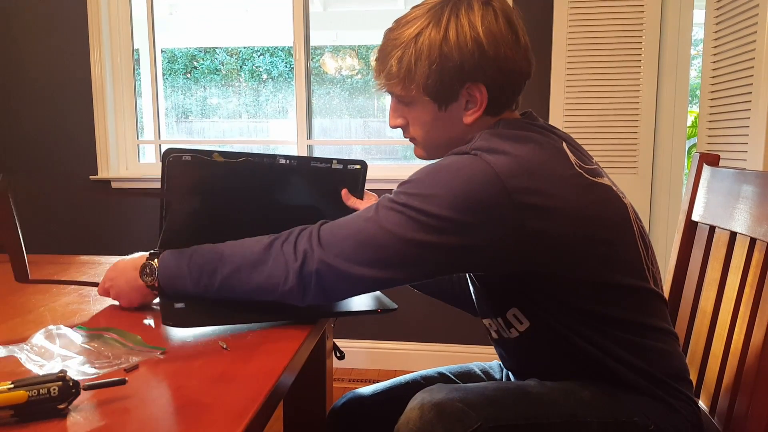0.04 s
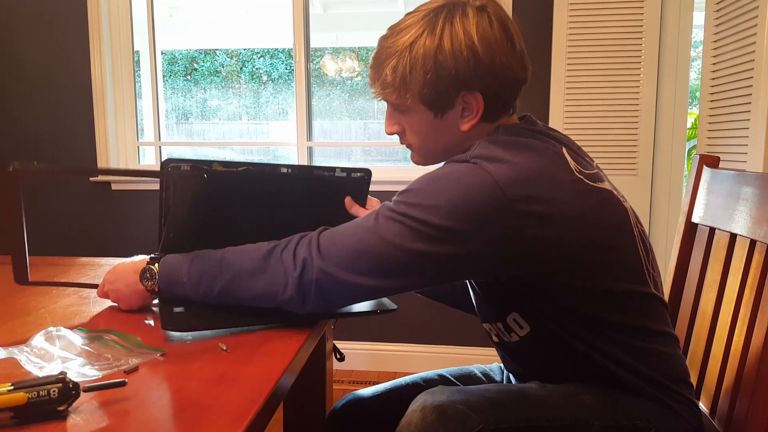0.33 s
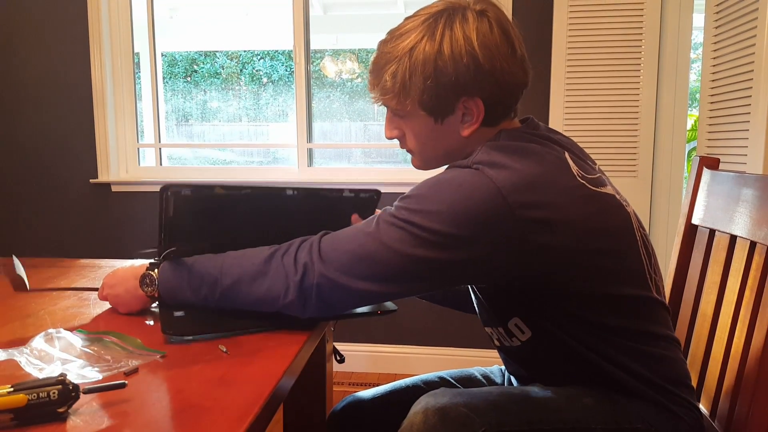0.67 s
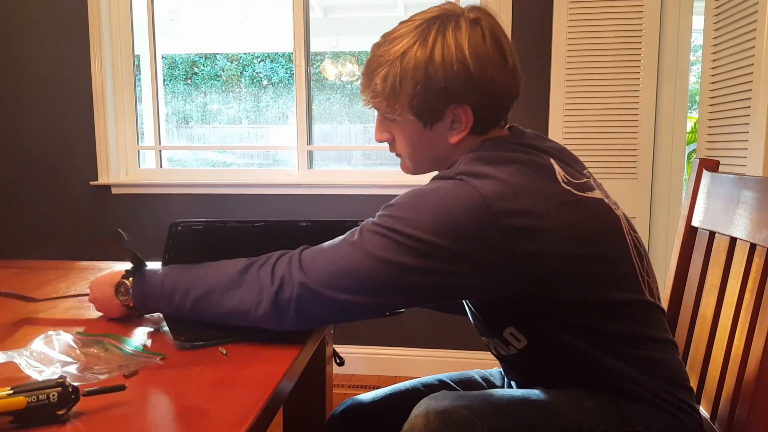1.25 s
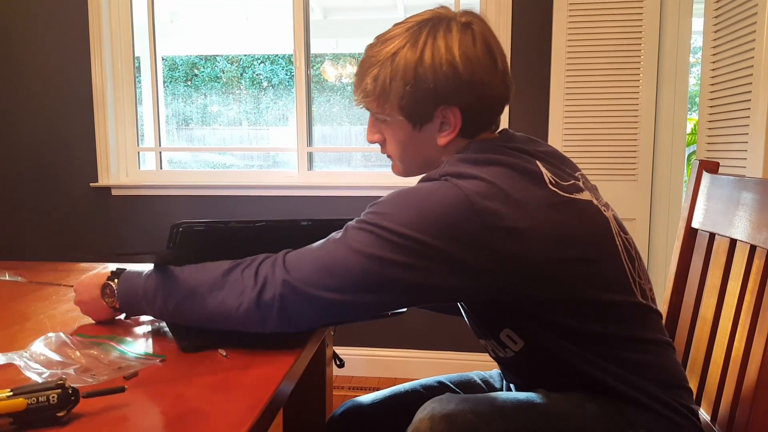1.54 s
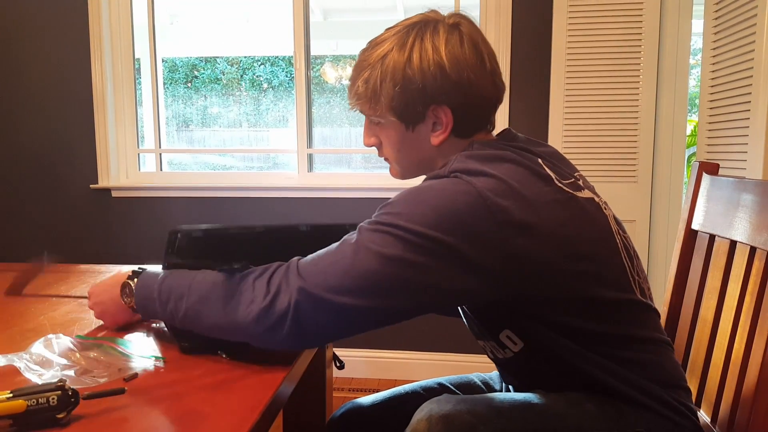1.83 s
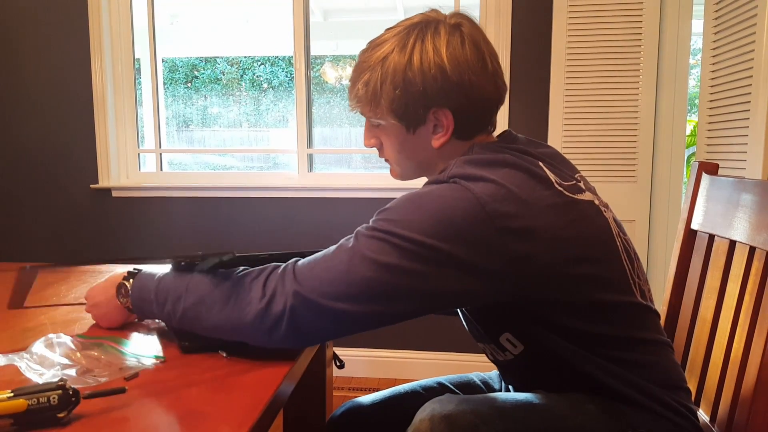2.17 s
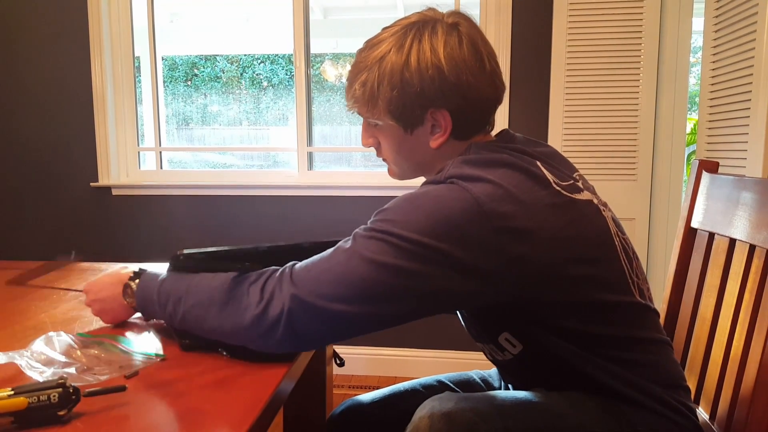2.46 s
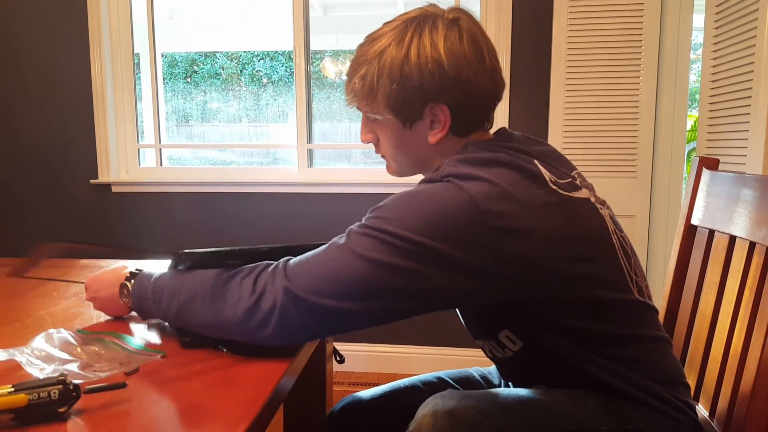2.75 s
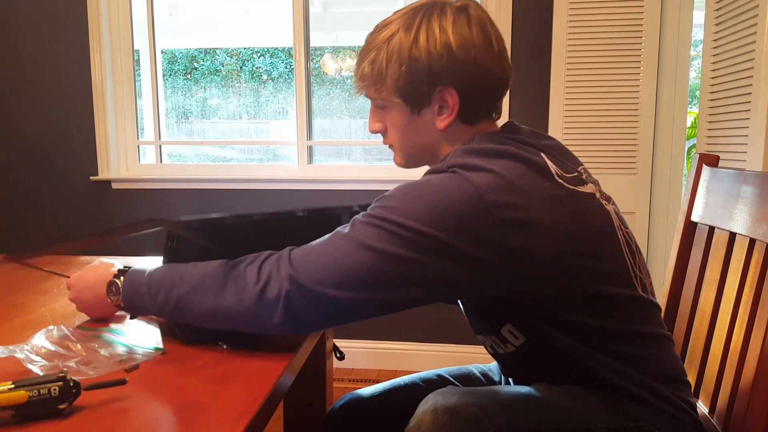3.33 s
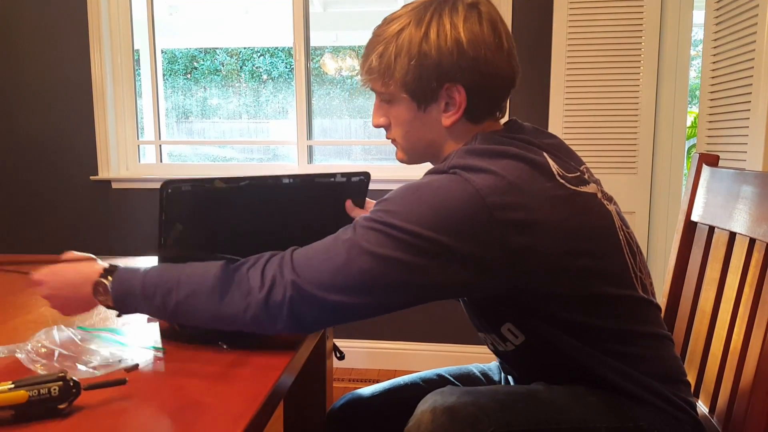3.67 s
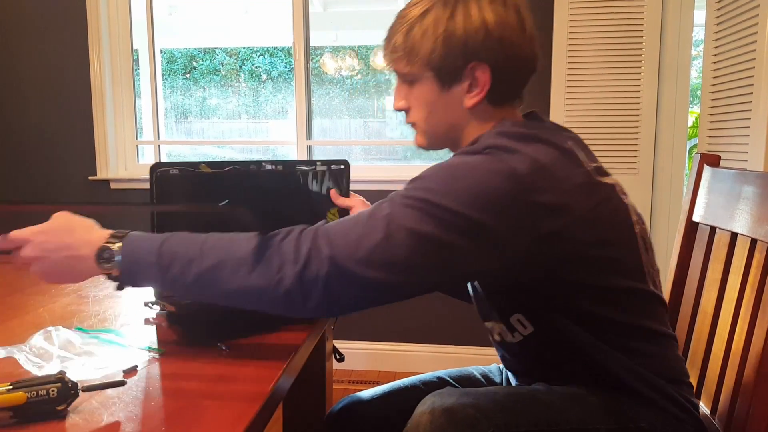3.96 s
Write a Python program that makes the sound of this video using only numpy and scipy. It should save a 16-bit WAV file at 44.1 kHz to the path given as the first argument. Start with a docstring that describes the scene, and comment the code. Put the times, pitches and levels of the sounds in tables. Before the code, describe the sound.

Plastic laptop lid clicking and knocking as it is lowered and raised in a quiet room.

```python
"""Closing and opening a laptop

A plastic laptop lid is lowered, pressed down and raised again on a wooden table in a quiet room.
Catches snap, the case knocks and rings briefly into the room, and plastic and sleeve rub. Tiny slips
make the hinge hiss and the plastic creak. A household appliance hums underneath."""
import sys
import numpy as np
from scipy import signal
from scipy.fft import rfft, irfft
from scipy.io import wavfile

SR = 44100
rng = np.random.default_rng(int(sys.argv[2]) if len(sys.argv) > 2 else 0)


def dump(signal):
    """Clip the signal to [-1, 1] and save it as 16-bit WAV at the path in sys.argv[1]."""
    limited = np.clip(np.atleast_2d(signal).T, -1, 1)
    pcm = np.round(limited * 32767).astype(np.int16)
    wavfile.write(sys.argv[1], SR, pcm)


N = 176400

# each time lid and case touch: (time [s], low [dB], mid [dB], treble [dB], top [dB],
# extra level of the snap [dB], pitch of the struck spot [Hz])
TOUCHES = [ (0.008, -63, -58, -69, -71, 4, 1220), (0.388, -69, -57, -62.5, -55.5, 6, 1940),
           (1.527, -59, -48.5, -43, -46.5, 7.5, 2210), (1.625, -50, -56.5, -72, -82, -10, 457),
           (1.820, -56, -62, -64, -69, -10, 1930), (1.986, -69, -52.5, -51.5, -53.5, 8.5, 7350),
           (2.065, -65, -51.5, -49.5, -62, 4, 7100), (2.115, -48.5, -39.5, -47.5, -54, 1, 974),
           (2.314, -50.5, -43, -55.5, -61, 1, 2090), (2.362, -48, -43, -42, -50, 10.5, 7450),
           (2.385, -48.5, -46.5, -56, -52, -10, 7450), (2.484, -66, -46.5, -57.5, -67, 0, 880),
           (2.505, -58, -49, -55.5, -65, -6, 1227), (2.639, -63, -54, -63, -80, -3, 1007),
           (2.699, -47, -48.5, -64, -61, 3, 1283), (2.711, -51, -70, -54.5, -54, 0, 11900),
           (2.761, -43.5, -46.5, -55, -64, 10, 340), (2.765, -48, -42.5, -46.5, -52.5, 7, 1280),
           (2.791, -52, -56, -52.5, -58, 6, 356), (2.852, -57, -57, -53, -61, 5, 640),
           (2.888, -66, -49, -63, -76, 2, 1283), (3.256, -72, -60, -69, -77, 6, 2544),
           (3.497, -60, -54.5, -61.5, -55, 10.5, 13700), (3.622, -62, -57, -57.5, -74, 8, 2970),
           (3.838, -49.5, -53.5, -64, -74, 8, 609), (3.982, -52.5, -51.5, -67.5, -80, -1, 644)]
# how alike left and right sound: (frequency [Hz], likeness [0 to 1])
STEREO_LIKENESS = [(60, .99), (140, 0.93), (350, 0.89), (700, 0.61), (1400, 0.049), (2800, 0.17),
                   (14000, 0.04)]
EDGES_HZ = np.geomspace(28, 17000, 21)  # borders of the noise bands
BANDS_HZ = np.sqrt(EDGES_HZ[1:] * EDGES_HZ[:-1])
TAIL, ATTACK_S = int(.7 * SR), 0.00085  # a knock's length in samples, and its rise time
SPOT_Q = 29  # higher means a touched spot rings at a clearer pitch


def from_db(db):
    """Turn decibels into a gain to multiply by."""
    return 10 ** (np.asarray(db) / 20)


def rms_one(x):
    """Scale a signal so its average strength (rms) is 1."""
    return x / np.sqrt(np.mean(x ** 2) + 1e-20)


def at_hz(points, hz):
    """Read between the rows of a table, spacing octaves evenly."""
    row_hz, value = np.transpose(points)
    return np.interp(np.log(hz), np.log(row_hz), value)


def colour(levels, hz):
    """Gain at hz of a sound with the given low, mid, treble and top levels."""
    # tone shared by knocks, snaps and rubs: (frequency [Hz], level [dB])
    body = [(40, -41), (120, -8), (240, -6.5), (500, -5.5), (1300, -3), (2400, -5), (3600, -5.5),
            (6500, -5.5), (10000, -6.5), (14000, -5.5)]
    own_db = np.interp(np.log(hz), np.log([350, 1300, 6000, 14000]), levels)
    return from_db(own_db + at_hz(body, hz))


def pan(right_db):
    """Left and right gains that make the right side louder by right_db."""
    return from_db(np.array([[-right_db], [right_db]]) / 2)


def drift(rate_hz):
    """A smooth random wobble, about 1 in size."""
    hz = np.arange(N // 2 + 1) * SR / N
    spectrum = rfft(rng.standard_normal(N))
    return rms_one(irfft(spectrum / (1 + (hz / rate_hz) ** 2), N))


def peaks(x, table):
    """Boost or cut x around each (frequency [Hz], boost [dB], width [Hz])."""
    for hz, db, width in table:
        gain = from_db(db / 2)
        spread = np.tan(np.pi * width / SR)
        tuning = -2 * np.cos(2 * np.pi * hz / SR)
        x = signal.lfilter([1 + spread * gain, tuning, 1 - spread * gain],
                           [1 + spread / gain, tuning, 1 - spread / gain], x)
    return x


def noise_bands():
    """Stereo noises about half an octave wide, alike on both sides in the bass."""
    white, out = rng.standard_normal((2, 2, N + TAIL)), []
    for k, hz in enumerate(BANDS_HZ):
        bandpass = signal.butter(2, EDGES_HZ[k:k + 2], "band", fs=SR, output="sos")
        mid, side = signal.sosfilt(bandpass, white[k % 2])[:, TAIL:]
        alike = at_hz(STEREO_LIKENESS, hz)
        out.append(rms_one(np.sqrt(1 + alike) * mid + np.sqrt(1 - alike) * side * [[1], [-1]]))
    return np.array(out, dtype=np.float32)


def add(out, start_s, sound):
    """Mix a sound into out at the given time."""
    i = int(np.clip(start_s * SR, 0, N - 1))
    out[:, i:i + sound.shape[1]] += sound[:, :N - i]


def swell(peak_s, rise_s, fall_s):
    """A bell-shaped rise and fall in loudness."""
    t = np.arange(N) / SR - peak_s
    width = np.where(t < 0, rise_s, fall_s)
    return np.exp(-np.minimum((t / width) ** 2 / 2, 20))


def room_tone():
    """Soft rumble, hiss and a thin whine under an appliance's wavering mains hum."""
    # rumble and hiss: (frequency [Hz], level per band [dB])
    background = [(30, -68), (42, -78), (58, -55), (85, -55), (125, -56.5), (165, -55.5), (250, -58.5),
                  (350, -66), (520, -61.5), (800, -69), (1700, -70), (3000, -78.5), (6000, -77.5),
                  (10000, -80.5), (15000, -77)]
    # tones of the hum: (pitch [Hz], level [dB], amount of wavering [ratio])
    hum = [(119.9, -46, 0.59), (242.4, -60.5, 1.12), (364.4, -68, 0.92), (489, -67, 1.4),
           (592.5, -67.5, 0.64), (883, -73, 2.7)]
    # narrow boosts that turn hiss into a whine: (pitch [Hz], boost [dB], width [Hz])
    whine = [(10400, 14, 110), (13300, 13.5, 56)]
    t, waver_hz = np.arange(N) / SR, 13.3
    out = np.tensordot(from_db(at_hz(background, BANDS_HZ)), noise_bands(), 1)
    for hz, db, waver in hum:
        phase = 2 * np.pi * (hz * t + rng.random())
        wobble = drift(waver_hz) * np.sin(phase) + drift(waver_hz) * np.cos(phase)
        out = out + from_db(db) * rms_one(np.sin(phase) + waver / 2 * wobble)
    return peaks(out * pan(right_db=1.13), whine)


def knocks(bands):
    """Each touch rings the lid and the case, whose many tones blur into noise and echo in the room."""
    # the room's echo: (frequency [Hz], time to fade by 60 dB [s])
    echo_times = [(200, 0.7), (1200, 0.44), (5000, 0.45), (14000, 0.31)]
    ring_s, echo_db, spot_db = 0.15, -2, 9.5
    out, t = np.zeros((2, N)), np.arange(TAIL) / SR
    echo = from_db(echo_db) * 1000 ** (-t / at_hz(echo_times, BANDS_HZ)[:, None])
    ring = 1000 ** (-t / ring_s)
    fade = np.hypot(ring, echo) * (1 - np.exp(-t / ATTACK_S))
    offsets = rng.integers(0, N - TAIL, len(TOUCHES))
    for (start_s, *levels, _, spot_hz), i in zip(TOUCHES, offsets):
        band_gains = fade * colour(levels, BANDS_HZ)[:, None]
        knock = np.einsum("bt,bct->ct", band_gains, bands[:, :, i:i + TAIL])  # add up the bands
        add(out, start_s, peaks(knock, [(spot_hz, spot_db, spot_hz / SPOT_Q)]))
        add(out, start_s, lid_ring(levels))
    return out


def lid_ring(levels):
    """The struck lid rings at its own pitches, in a new balance each time."""
    # long-ringing tones of the lid: (pitch [Hz], level [dB], time to fade by 60 dB [s])
    lid_tones = [(594, -6, 0.66), (958, 2.5, .15), (1281, -2, 0.28), (1876, -11, 0.18), (2206, -2, 0.25),
                 (2500, -4, 0.098), (3595, -5, 0.4), (4320, -5, 0.38), (4850, -1, 0.17), (5160, -12, 0.14),
                 (6100, -1.5, 0.12), (7400, -11, 0.25)]
    hz, db, fade_s = np.transpose(lid_tones)
    t = np.arange(TAIL // 2) / SR
    scatter_db = rng.uniform(-12.75, 4.25, len(hz))
    gain = colour(levels, hz) * from_db(db + scatter_db)
    hz = hz * rng.normal(1, 0.0033, len(hz))  # the hand's grip shifts each pitch a little
    ringing = np.exp(np.outer(2j * np.pi * hz - np.log(1000) / fade_s, t))  # one fading tone a row
    side_phase = rng.uniform(-np.pi, np.pi, (2, len(hz))) * (1 - at_hz(STEREO_LIKENESS, hz))
    stereo = ((gain * np.exp(1j * side_phase)) @ ringing).imag
    return stereo * (1 - np.exp(-t / ATTACK_S))


def snaps():
    """The sharp crack of each touch: high tones lasting a few milliseconds, louder on the right."""
    # tones of a snapping catch: (pitch [Hz], level [dB], time to fade by 60 dB [s])
    catch_tones = [(2130, 3.5, 0.0036), (5630, 7.5, 0.0026), (6840, 10, 0.0039), (8300, 12, 0.0017),
                   (13400, 6.5, 0.0074)]
    out, t = np.zeros((2, N)), np.arange(SR // 20) / SR
    detunes = rng.normal(1, 0.049, (len(TOUCHES), len(catch_tones)))
    for (start_s, *levels, snap_db, _), detune in zip(TOUCHES, detunes):
        crack = np.zeros((1, len(t)))
        for k, (hz, db, fade_s) in enumerate(catch_tones):
            gain = (-1) ** k * colour(levels, hz) * from_db(db + snap_db)  # every other tone is flipped
            crack += gain * np.sin(2 * np.pi * hz * detune[k] * t) * 1000 ** (-t / fade_s)
        add(out, start_s, crack)
    return out * pan(right_db=15.5)


def slipping(tones, slips_per_s=1400, scatter_db=0.5):
    """Surfaces stick and slip, and each tiny jolt rings the tones. Gives one stereo sound per tone."""
    slips = (rng.random(N) < slips_per_s / SR) * from_db(scatter_db * rng.uniform(-1, 1, N))
    out = []
    for hz, _, width in tones:
        decay = np.exp(-np.pi * width / SR)
        feedback = [1, -2 * decay * np.cos(2 * np.pi * hz / SR), decay ** 2]
        jolts = slips * rng.standard_normal((2, N)) + 1e-18
        out.append(rms_one(signal.lfilter([1, 0, -1], feedback, jolts)))
    return out


def hinge():
    """The hinge slides with a thin hiss while the lid turns."""
    # loudness of the sliding: (time [s], level [dB])
    slide_levels = [(0.2, -90), (0.3, -66.5), (0.62, -71), (1.05, -67.5), (1.2, -87), (2.85, -97),
                    (3.02, -67), (3.15, -72), (3.4, -92)]
    # where the hinge rings: (pitch [Hz], level [dB], width [Hz])
    hinge_tones = [(1860, -2.5, 130), (7460, -7.5, 340), (13040, -10, 610)]
    level = from_db(np.interp(np.arange(N) / SR, *np.transpose(slide_levels)))
    return level * sum(from_db(db) * sound for (_, db, _), sound in zip(hinge_tones, slipping(hinge_tones)))


def rubs(bands):
    """Plastic and sleeve rub: grainy noise that swells with each movement and sings at one pitch."""
    # movements: (loudest at [s], rise [s], fall [s], low [dB], mid [dB], treble [dB], top [dB], pitch [Hz])
    movements = [ (0.65, 0.13, 0.17, -64, -67, -67.5, -72, 1860),
                 (1.02, 0.041, 0.12, -58.5, -63, -66, -71, 1956),
                 (1.33, 0.02, 0.086, -74, -69, -65, -72, 6100),
                 (1.52, 0.06, 0.08, -64, -63.5, -56.5, -64.5, 2180),
                 (1.66, 0.075, 0.11, -57.5, -69.5, -63.5, -67, 465),
                 (2.89, 0.05, 0.058, -63, -55, -66.5, -69, 1300),
                 (3.02, 0.32, 0.12, -63.5, -66, -65, -70, 6700),
                 (3.31, 0.026, 0.055, -67, -63.5, -72.5, -83, 2270),
                 (3.60, 0.046, 0.032, -61, -55, -55.5, -64, 1110),
                 (3.70, 0.078, 0.071, -59, -72, -69.5, -80, 4300),
                 (3.83, 0.014, 0.023, -53.5, -59.5, -75, -85, 600)]
    spot_db, rough_db = 8, 1
    out = 0
    for peak_s, rise_s, fall_s, *levels, hz in movements:
        friction = np.tensordot(colour(levels, BANDS_HZ).astype(np.float32), bands, 1)
        friction = np.roll(friction, rng.integers(N), axis=1)  # a new stretch of noise for each rub
        out = out + swell(peak_s, rise_s, fall_s) * peaks(friction, [(hz, spot_db, hz / SPOT_Q)])
    return out * from_db(rough_db * drift(rate_hz=119))


def creak():
    """Strained plastic creaks as the lid is pulled open, its higher tones swelling later."""
    # where the plastic rings: (pitch [Hz], level [dB], width [Hz])
    creak_tones = [(2285, -1.5, 46), (2620, -1.5, 220), (3110, -6, 63), (4170, -8, 49), (4700, -6, 260),
                   (6500, -7, 220), (7000, -12, 300)]
    first_peak_s, swell_s, climb_s_per_octave, level_db = 3.578, 0.021, 0.016, -54
    out = 0
    for (hz, db, _), sound in zip(creak_tones, slipping(creak_tones)):
        peak_s = first_peak_s + climb_s_per_octave * np.log2(hz / creak_tones[0][0])
        out = out + from_db(level_db + db) * sound * swell(peak_s, swell_s, swell_s)
    return out


def scene():
    """The laptop, louder on the right but a moment earlier on the left, over the room's hum."""
    # pitches the hollow case strengthens: (pitch [Hz], boost [dB], width [Hz])
    case_peaks = [(489, 6, 77), (594, 3, 89), (1950, 1.5, 180), (2200, 1, 270)]
    right_lag_s = .00013
    bands = noise_bands()
    handling = peaks(knocks(bands) + rubs(bands), case_peaks)
    left, right = (handling + hinge() + creak()) * pan(right_db=2.5) + snaps()
    right = np.roll(right, round(right_lag_s * SR))
    return np.array([left, right]) + room_tone()


def record(dry):
    """The microphone colours the treble, and a steep filter cuts the very top."""
    # the microphone's peaks and dip: (frequency [Hz], boost [dB], width [Hz])
    mic_peaks = [(7350, 3, 1870), (10400, -5, 2100), (12700, 5, 1500)]
    top_cut = signal.ellip(10, .2, 80, 15800, fs=SR, output="sos")
    return signal.sosfilt(top_cut, peaks(dry, mic_peaks))


dry = scene()
out = record(dry)
dump(out)
```